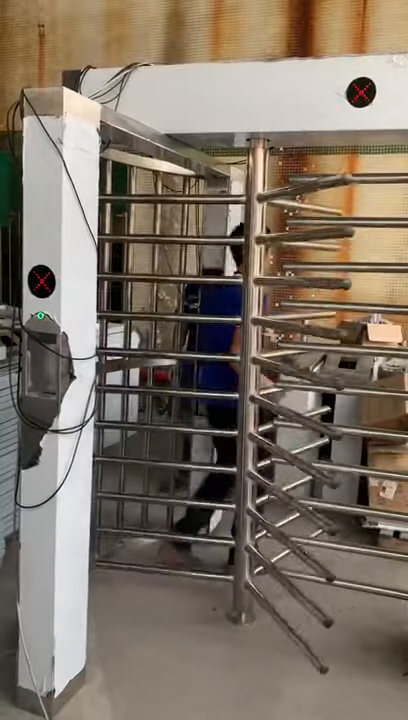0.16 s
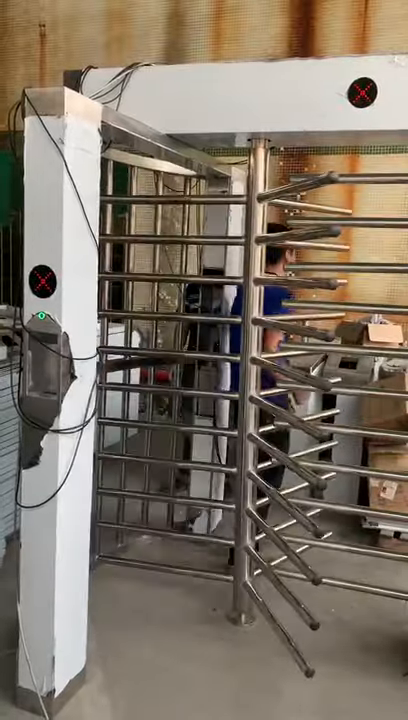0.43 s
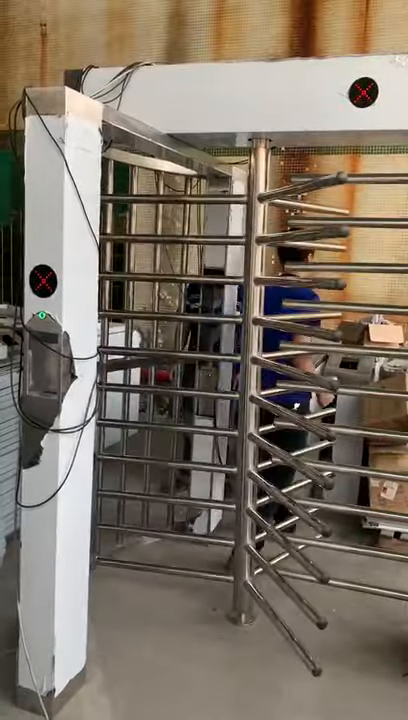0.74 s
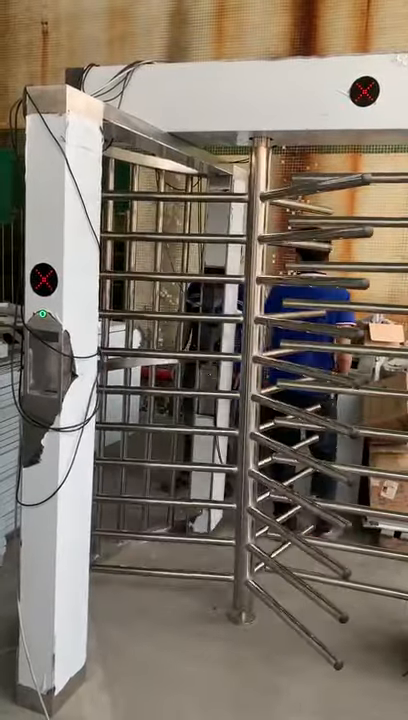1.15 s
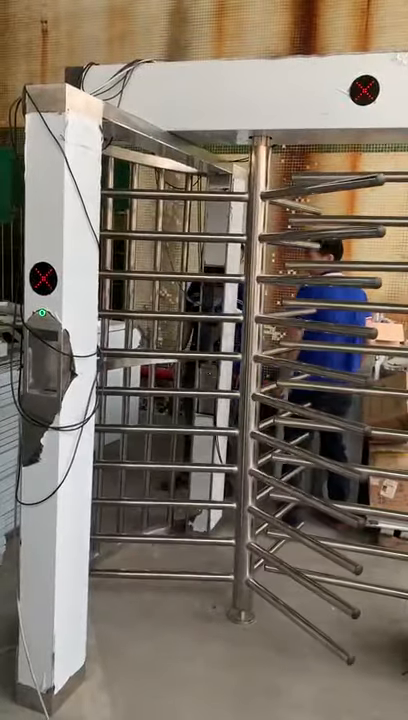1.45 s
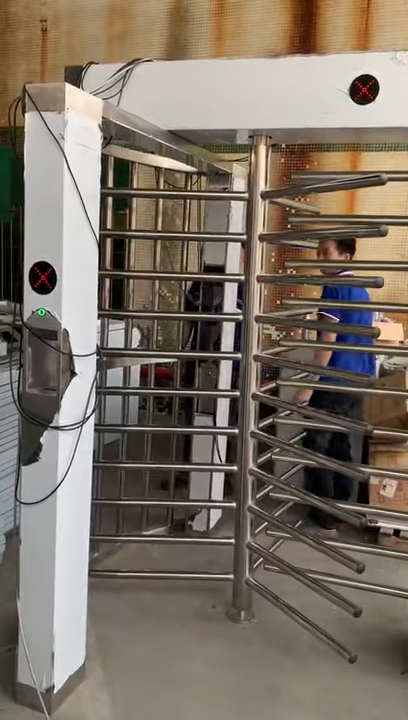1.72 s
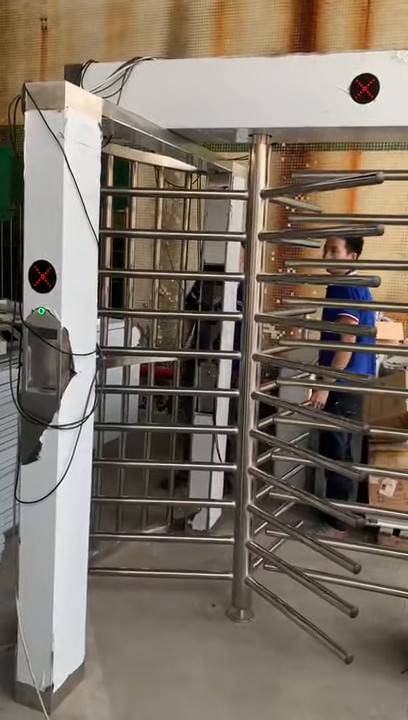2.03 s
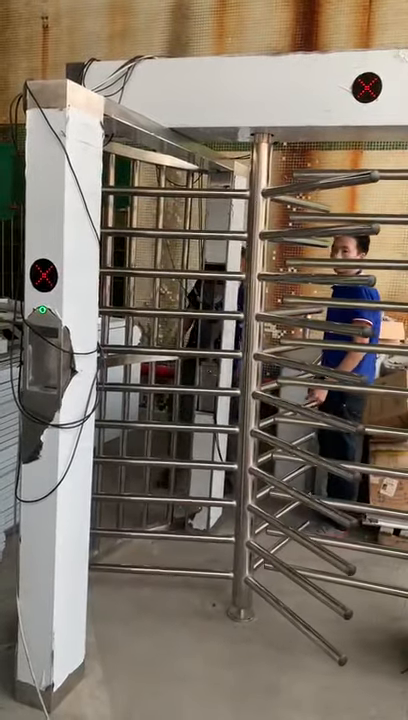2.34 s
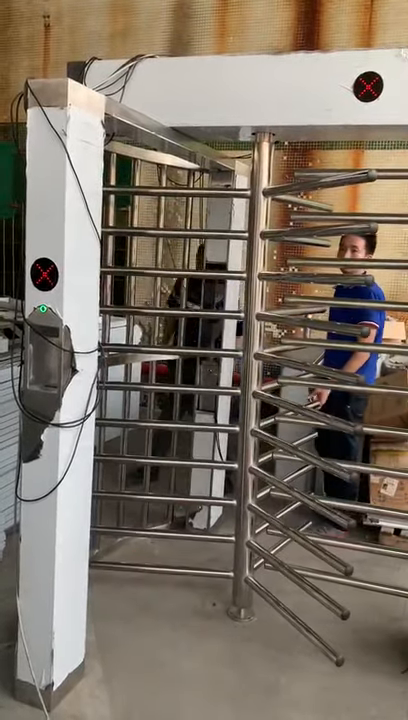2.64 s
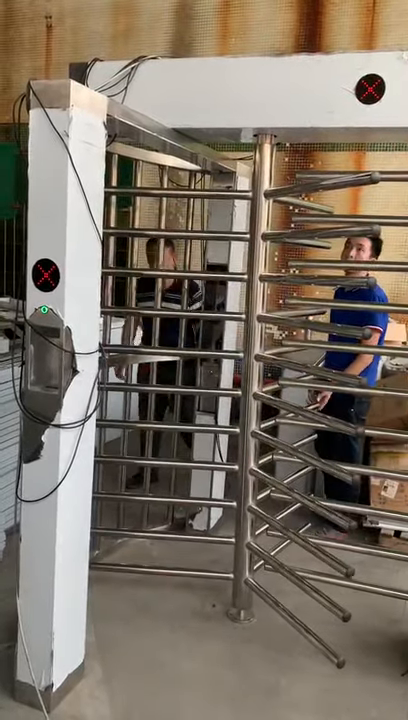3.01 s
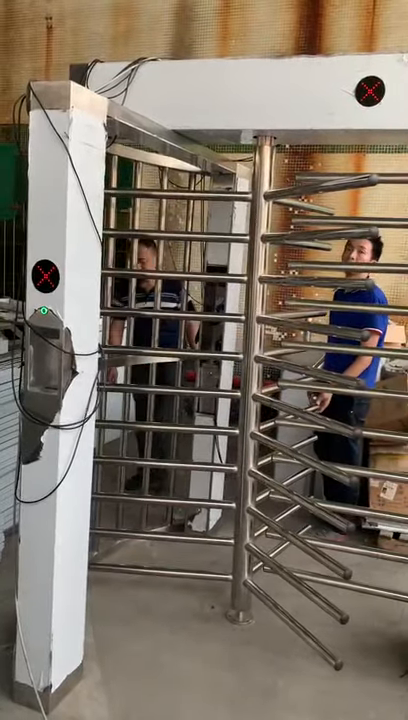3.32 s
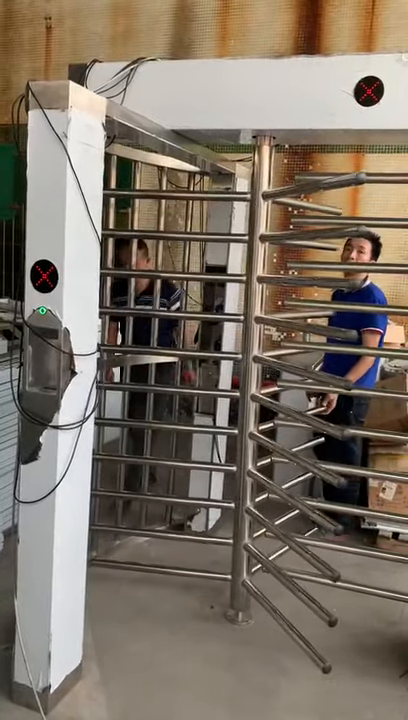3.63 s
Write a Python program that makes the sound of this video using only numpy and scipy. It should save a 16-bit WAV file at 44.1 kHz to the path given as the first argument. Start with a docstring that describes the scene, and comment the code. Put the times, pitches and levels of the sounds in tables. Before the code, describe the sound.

A steel turnstile rotor scrapes and bangs in a fast cluster at the start, its hollow head box booming and bars ringing; gritty shoe scuffs follow in a rumbling workshop, single mono microphone, slightly dulled top.

```python
"""In a workshop, a full-height steel turnstile is pushed round. The pawl drags and knocks: coloured noise bursts.
The rotor clunks against its head box and the steel bars ring on: decaying sine modes over noise.
Random contacts and small clicks follow, while shoes scuff over concrete: dense random slips under smooth arches.
Machines rumble and hum throughout: steady coloured noise and wavering sines.
The whole sound has three narrow dips in its treble and a cut top."""
import sys
import numpy as np
from scipy import signal
from scipy.fft import rfft, irfft
from scipy.io import wavfile

SR = 44100
rng = np.random.default_rng(int(sys.argv[2]) if len(sys.argv) > 2 else 0)


def generate_wav(sig):
    """Save sig (samples, or channels by samples) to the path in sys.argv[1] as 16-bit PCM at SR."""
    pcm = np.round(np.clip(np.atleast_2d(sig).T, -1, 1) * 32767).astype(np.int16)
    wavfile.write(sys.argv[1], SR, pcm)


N = 166257  # length in samples

# Pawl and bar contacts of the rotor. Each row: start in seconds, knock level in dB on top of KNOCK_DB,
# bright tick level in dB on top of TICK_DB, first snap level in dB on top of SNAP_DB.
PAWL_KNOCKS = [(0.016, -25, -16, -23), (0.039, -14, -4, -12), (0.054, -2, -11, -10), (0.067, -8, -15, -14),
               (0.102, -4.5, -8, -10), (0.1202, -11, 0, 3), (0.1424, -8, -0.5, 7), (0.22, -10.5, -21, -25),
               (0.24, -18, -16, -16), (0.407, -13, -4.5, 2), (0.6225, -17, -11, -5),
               (1.347, -23, -20.5, -25)]
KNOCK_DB, KNOCK_T60_S = -37.5, 0.58
TICK_DB, TICK_T60_S = -45, 0.309
CRACK_DB, CRACK_T60_S = 5.5, 0.033  # level on top of KNOCK_DB
SNAP_DB, SNAP_T60_S = -43.5, 0.0138
CLATTER_DB, CLATTER_RATE_HZ = 1.2, 90  # unevenness of the decay
# Colour of a knock, then of its tick and snap. Each row: frequency in Hz, relative level in dB.
KNOCK_COLOUR = [(200, -6), (600, -9), (1000, 0), (1600, 0.5), (2500, -3), (3300, -15), (4300, -23),
                (7000, -12), (14000, -58)]
TICK_COLOUR = [(1000, -32), (4000, -26), (7000, -6), (10500, 6.5), (12000, 5), (14000, 2.5)]
STEEL_GRAIN_HZ, STEEL_RIPPLE_DB = 44.86, 3  # spacing and depth of the frame's many small resonances

# Modes of the steel bars. Each row: frequency in Hz.
BAR_MODE_HZ = [935, 1165, 1238, 1906, 2003, 2183, 2348, 2580, 2650, 2821, 2890, 3427, 6240, 6541, 6971,
               7122, 11538]
# Ring of each bar mode, in the same order. Each row: level in dB on top of BARS_DB, T60 in seconds.
BAR_MODE_RING = [(6.5, 1.2), (2, 1.2), (-1.5, 0.43), (2, 1.8), (-1.5, 0.55), (2, 0.29), (-5, 16), (-6, .7),
                 (-4, 2.2), (0, 1.5), (-2, .5), (-4, 1.4), (-16, 5.7), (-20, 4.4), (-14, 1.4), (-17, 2),
                 (-10, 0.87)]
# Colour of the bars' high shimmer. Each row: frequency in Hz, relative level in dB.
SHIMMER_COLOUR = [(2000, -20), (3400, 5.5), (4500, -4), (6500, -2.5), (7500, -14), (9000, -41),
                  (14000, -39)]
BARS_DB, SHIMMER_DB, SHIMMER_T60_S = -57.5, -63.5, 7.45
RING_FLUTTER_DB, RING_FLUTTER_RATE_HZ, RING_SMEAR_RAD = 2, 14, 0.5

# The rotor's weight meets the head box. Each row: start in seconds, level in dB on top of BOX_DB and THUD_DB.
BOX_CLUNKS = [(0.106, -3.5), (0.116, -0.5), (0.165, -7.5), (0.247, -6), (0.324, -13)]
# Head box modes. Each row: frequency in Hz, relative level in dB, T60 in seconds.
BOX_MODES = [(229, 2, 0.6), (249.2, 1, 0.59), (302.4, 1, 0.83), (350, -2, 0.73), (404, -1.5, 1.1),
             (426.8, -2.5, 1.7), (463, -4.5, 1.1)]
# Colour of the box's thud. Each row: frequency in Hz, relative level in dB.
THUD_COLOUR = [(60, -25), (200, -5), (340, -0.5), (490, -7.5), (620, -21), (900, -15), (3000, -47.5)]
BOX_DB, THUD_DB, THUD_T60_S = -43.5, -39.5, 1

# Colour of the pawl's drag over the ratchet. Each row: frequency in Hz, relative level in dB.
DRAG_COLOUR = [(400, 1.5), (1500, 5), (3500, -1.5), (5500, -7), (7000, -1.5), (8500, -10), (11000, -6.5),
               (14000, -17)]
DRAG_START_S, DRAG_LENGTH_S, DRAG_DB = 0.0, 0.081, -42.5
DRAG_ATTACK_S, DRAG_RELEASE_S = 0.0079, 0.0086
CHATTER_HZ, CHATTER_WANDER_DB, CHATTER_DEPTH_DB = 142, 3.5, 2.5  # the slip rate itself wanders

# Play in the coasting rotor makes tiny contacts.
RATTLE_START_S, RATTLE_LENGTH_S, RATTLE_PER_S = 0.74, 0.27, 60
RATTLE_DB, RATTLE_SPREAD_DB = -78, 1

# Light ticks of loose parts. Each row: start in seconds, level in dB, clink in dB on top of that level.
LOOSE_TAPS = [(0.841, -64, -8), (0.9061, -71, -5), (0.969, -68, 3), (1.1853, -72, -4),
              (3.3736, -66.5, 16.5), (3.3836, -66.5, 21), (3.394, -77, 24), (3.5755, -66, -2.5)]
# Colour of a tap. Each row: frequency in Hz, relative level in dB.
TAP_COLOUR = [(1000, -1), (3000, 4.5), (4500, -4), (7000, -2), (11000, -3), (14000, -7)]
# Modes of a tap's clink. Each row: frequency in Hz, relative level in dB, T60 in seconds.
CLINK_MODES = [(2790, -2, 0.026), (2980, -1, 0.0156), (3210, -14, 0.012)]
TAP_T60_S, TAP_CRACK_DB, TAP_CRACK_T60_S = 0.0395, 5, 0.011  # crack level on top of the tap's

# Shoe scuffs. Each row: start in seconds, length in seconds, attack in seconds, level in dB,
# treble tilt in dB per octave above about 1 kHz.
SHOE_SCUFFS = [(0.614, 0.11, 0.014, -52.5, 0.5), (0.93, 0.07, .04, -70, 8), (1.165, .045, .022, -72, 8),
               (1.21, 0.067, 0.016, -69, 1), (1.333, 0.077, 0.0374, -53.5, -2.5),
               (1.39, .07, .025, -71, -4.5), (1.467, 0.044, 0.0326, -54.5, -2.5),
               (1.478, 0.222, .11, -51, -0.5), (1.871, 0.1, 0.0356, -53.5, -2.5)]
# Colour of a scuff, then of its room tail. Each row: frequency in Hz, relative level in dB.
SCUFF_COLOUR = [(300, -30), (1000, 6.5), (2200, 1.5), (3200, -2), (4500, -7), (6000, -1.5), (7000, 3),
                (8300, -7.5), (11000, -2.5), (14000, -8)]
ROOM_COLOUR = [(200, 14), (3000, 6), (6500, 1), (10000, -12), (14000, -18)]
SCUFF_JUDDER_DB, SCUFF_JUDDER_RATE_HZ, SCUFF_ARCH_POWER = 0.1, 130, 1.36
GRIT_PER_S, GRIT_SPREAD_DB = 9900, 0.6  # also the grit of the drag
SCUFF_ROOM_DB, ROOM_T60_S = -4, 0.71

# Workshop background noise. Each row: frequency in Hz, relative level in dB per Hz.
RUMBLE_COLOUR = [(15, -14), (28, -10.5), (40, 4), (58, 1), (76, -4.5), (125, -4), (200, -7.5), (300, -11),
                 (440, -14.5), (600, -19.5), (780, -20), (950, -18), (1500, -20.5), (2000, -26),
                 (3100, -37.5), (3800, -39.5), (4500, -49), (5800, -48.5), (8000, -59), (11500, -61.5),
                 (14000, -67)]
# Machine hum. Each row: frequency in Hz, rms level in dB.
MACHINE_HUM = [(61, -45), (301, -54), (324.5, -56), (649, -63.5)]
RUMBLE_DB, SWELL_DB, FLICKER_DB = -38.5, 0.37, 0.98
HUM_WAVER_DB, HUM_DRIFT = 1, 0.00406  # drift as a fraction of the pitch

# Narrow fixed dips in the treble of the whole sound. Each row: centre in Hz, width in Hz.
TREBLE_DIPS = [(4860, 420), (9080, 810), (13300, 1170)]
DIP_DEPTH_DB, TOP_HZ = 26, 14250


def undb(db):
    """Decibels to gain."""
    return 10 ** (np.asarray(db) / 20)


def unit(x):
    """Scale to rms 1."""
    return x / np.sqrt(np.mean(x ** 2))


def colour(x, points, tilt_db=0):
    """Filter by (Hz, dB) points, with an optional tilt per octave above 1024 Hz."""
    octave = np.log2(np.maximum(np.fft.rfftfreq(len(x), 1 / SR), 1))
    hz, db = np.array(points, float).T
    shape = np.interp(octave, np.log2(hz), db) + tilt_db * np.maximum(octave - 10, 0)
    return irfft(rfft(x) * undb(shape), len(x))


def noise(points):
    """Coloured noise of rms 1."""
    return unit(colour(rng.standard_normal(N), points))


def fade(start, t60):
    """A sudden start and an exponential decay of 60 dB in t60 seconds."""
    age = np.arange(N) / SR - start
    return (age >= 0) * np.exp(-np.log(1000) * np.maximum(age, 0) / t60)


def stroke(start, length, attack, release):
    """Attack, hold and release of a rubbing contact."""
    age = np.arange(N) / SR - start
    return np.clip(age / attack, 0, 1) * np.exp(-np.maximum(age - length, 0) / release)


def swell(start, length, attack):
    """A sole presses harder, then lifts: one smooth arch."""
    age = np.arange(N) / SR - start
    place = np.interp(age, [0, attack, max(length, attack)], [0, 1, 2])
    return np.maximum(place * (2 - place), 0) ** SCUFF_ARCH_POWER


def walk(rate):
    """A smooth random wander with an rms of 1, moving no faster than about the rate in Hz."""
    knots = signal.resample(rng.standard_normal(int(2 * rate * N / SR) + 2), 4096)
    place = np.linspace(0, len(knots) - 1, N)
    return unit(np.interp(place, np.arange(len(knots)), knots))


def ring(modes, hits):
    """Struck modes: the energy of the hits adds up, and echoes make each ring flutter."""
    push = np.zeros(N)
    for start, db, *_ in hits:
        push[int(start * SR)] += undb(db) ** 2
    out = np.zeros(N)
    for hz, db, t60 in modes:
        keep_per_sample = np.exp(-2 * np.log(1000) / (t60 * SR))
        energy = signal.lfilter([1], [1, -keep_per_sample], push + 1e-24)
        smear = RING_SMEAR_RAD * walk(RING_FLUTTER_RATE_HZ)
        phase = 2 * np.pi * hz * np.arange(N) / SR + smear
        level = undb(db + RING_FLUTTER_DB * walk(RING_FLUTTER_RATE_HZ))
        out += np.sqrt(energy) * level * np.sin(phase)
    return out


def grit(points, tilt_db=0):
    """Friction: dense tiny slips of uneven size."""
    moments = rng.random(N) < GRIT_PER_S / SR
    sizes = rng.standard_normal(N) * undb(GRIT_SPREAD_DB * rng.exponential(size=N))
    return unit(colour(moments * sizes, points, tilt_db))


def steel(x):
    """The frame's countless small resonances ripple the spectrum."""
    ripple = signal.resample(rng.standard_normal(int(SR / 2 / STEEL_GRAIN_HZ)), N // 2 + 1)
    return unit(irfft(rfft(x) * undb(STEEL_RIPPLE_DB * ripple), N))


def pawl():
    """Steel knocks on steel: each blow snaps, cracks and feeds the frame's unevenly fading clatter."""
    knock_energy = sum((undb(db) * fade(start, KNOCK_T60_S)) ** 2 for start, db, _, _ in PAWL_KNOCKS)
    tick_energy = sum((undb(db) * fade(start, TICK_T60_S)) ** 2 for start, _, db, _ in PAWL_KNOCKS)
    clatter = undb(KNOCK_DB) * np.sqrt(knock_energy) * steel(noise(KNOCK_COLOUR))
    clatter += undb(TICK_DB) * np.sqrt(tick_energy) * steel(noise(TICK_COLOUR))
    clatter *= undb(CLATTER_DB * walk(CLATTER_RATE_HZ))
    crack_shape = sum(undb(db) * fade(start, CRACK_T60_S) for start, db, _, _ in PAWL_KNOCKS)
    cracks = undb(KNOCK_DB + CRACK_DB) * crack_shape * noise(KNOCK_COLOUR)
    snap_shape = sum(undb(db) * fade(start, SNAP_T60_S) for start, _, _, db in PAWL_KNOCKS)
    snaps = undb(SNAP_DB) * snap_shape * noise(TICK_COLOUR)
    return clatter + cracks + snaps


def bars():
    """The knocks set the bars ringing: a few clear modes over a high shimmer of decaying coloured noise."""
    modes = [(hz, db, t60) for hz, (db, t60) in zip(BAR_MODE_HZ, BAR_MODE_RING)]
    energy = sum((undb(db) * fade(start, SHIMMER_T60_S)) ** 2 for start, db, _, _ in PAWL_KNOCKS)
    shimmer = noise(SHIMMER_COLOUR) * np.sqrt(energy)
    return undb(BARS_DB) * ring(modes, PAWL_KNOCKS) + undb(SHIMMER_DB) * shimmer


def head_box():
    """The hollow sheet-steel box booms as the rotor meets its stop: ringing modes and a noisy thud."""
    thud = sum(undb(db) * fade(start, THUD_T60_S) * noise(THUD_COLOUR) for start, db in BOX_CLUNKS)
    return undb(BOX_DB) * ring(BOX_MODES, BOX_CLUNKS) + undb(THUD_DB) * thud


def drag():
    """The pawl chatters over the ratchet in quick, uneven slips."""
    slip_rate = CHATTER_HZ * undb(CHATTER_WANDER_DB * walk(CHATTER_HZ / 2))
    slips = np.cumsum(slip_rate) / SR
    chatter = unit(undb(-CHATTER_DEPTH_DB * (slips % 1)))  # each slip starts loud and sags
    contact = stroke(DRAG_START_S, DRAG_LENGTH_S, DRAG_ATTACK_S, DRAG_RELEASE_S)
    return undb(DRAG_DB) * chatter * grit(DRAG_COLOUR) * contact


def rattle():
    """Tiny contacts fall at random while the rotor coasts."""
    age = np.arange(N) / SR - RATTLE_START_S
    coasting = (age > 0) * (age < RATTLE_LENGTH_S)
    contacts = (rng.random(N) < RATTLE_PER_S / SR) * coasting
    sizes = undb(RATTLE_DB + RATTLE_SPREAD_DB * rng.standard_normal(N))
    shape = signal.fftconvolve(contacts * sizes, fade(0, TAP_T60_S))[:N]
    return shape * noise(TICK_COLOUR)


def taps():
    """Faint dry ticks of loose parts: noise with a sharp front, plus a short clink of sines."""
    t = np.arange(N) / SR
    shape, clinks = np.zeros(N), np.zeros(N)
    for start, db, clink_db in LOOSE_TAPS:
        crack = undb(TAP_CRACK_DB) * fade(start, TAP_CRACK_T60_S)
        shape += undb(db) * (fade(start, TAP_T60_S) + crack)
        for hz, mode_db, t60 in CLINK_MODES:
            tone = np.sin(2 * np.pi * hz * (t - start))
            clinks += undb(db + clink_db + mode_db) * fade(start, t60) * tone
    return noise(TAP_COLOUR) * shape + clinks


def shoes():
    """Soles slide over gritty concrete; the hall gives a duller tail."""
    scuffs = np.zeros(N)
    for start, length, attack, db, tilt in SHOE_SCUFFS:
        scuffs += undb(db) * grit(SCUFF_COLOUR, tilt) * swell(start, length, attack)
    scuffs *= undb(SCUFF_JUDDER_DB * walk(SCUFF_JUDDER_RATE_HZ))
    hall = noise(ROOM_COLOUR) * fade(0.015, ROOM_T60_S)  # the tail enters 15 ms late
    tail = signal.fftconvolve(scuffs, hall / np.linalg.norm(hall))[:N]
    return scuffs + undb(SCUFF_ROOM_DB) * tail


def workshop():
    """Low rumble and air noise, with wavering hum from running machines."""
    level = RUMBLE_DB + SWELL_DB * walk(0.62) + FLICKER_DB * walk(17)
    background = noise(RUMBLE_COLOUR) * undb(level)
    for hz, db in MACHINE_HUM:
        pitch = hz * (1 + HUM_DRIFT * walk(3.87))
        phase = 2 * np.pi * np.cumsum(pitch) / SR
        background += np.sqrt(2) * undb(db + HUM_WAVER_DB * walk(3.4)) * np.sin(phase)
    return background


def scene():
    """Turnstile, shoes and workshop in one channel."""
    turnstile = pawl() + bars() + head_box() + drag() + rattle() + taps()
    return (turnstile + shoes() + workshop())[None]


def record(dry):
    """Three narrow dips in the treble and a cut top."""
    hz = np.fft.rfftfreq(2 * N, 1 / SR)
    dips = sum(np.exp(-np.abs(2 * (hz - centre) / width) ** 3) for centre, width in TREBLE_DIPS)
    heard = irfft(rfft(dry, 2 * N) * undb(-DIP_DEPTH_DB * dips))[:, :N]
    top_cut = signal.ellip(12, 0.2, 80, TOP_HZ, fs=SR, output="sos")
    return signal.sosfilt(top_cut, heard)


dry = scene()
out = record(dry)
generate_wav(out)
```